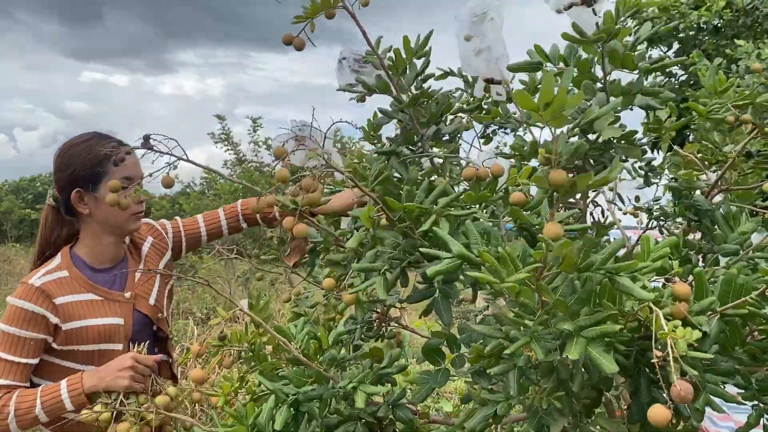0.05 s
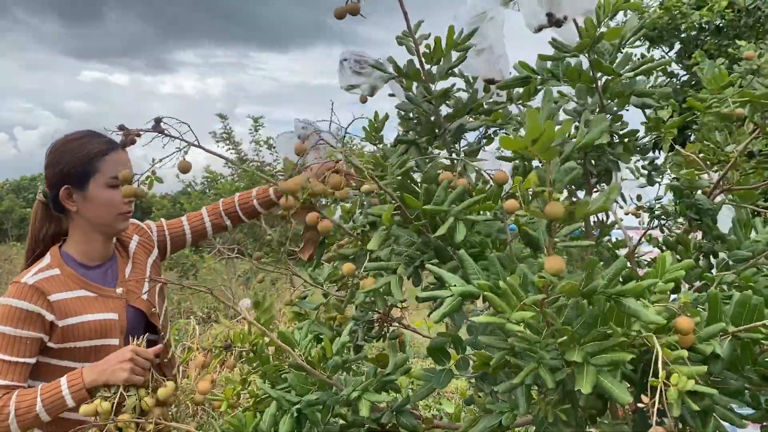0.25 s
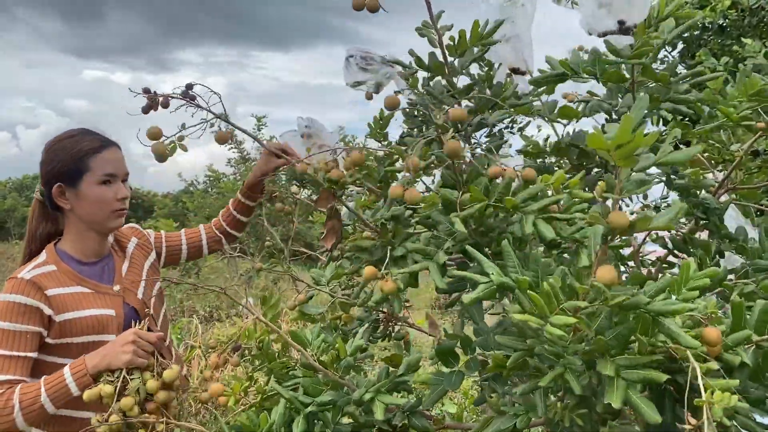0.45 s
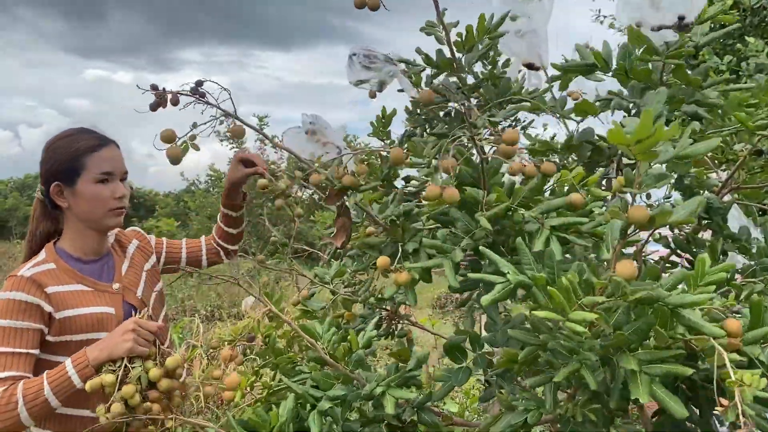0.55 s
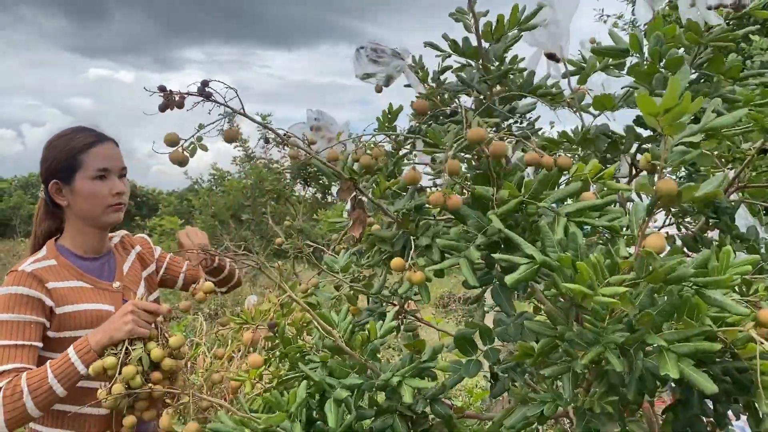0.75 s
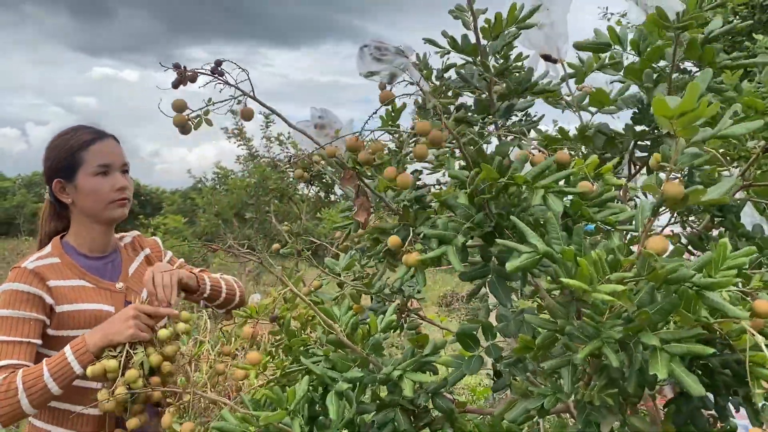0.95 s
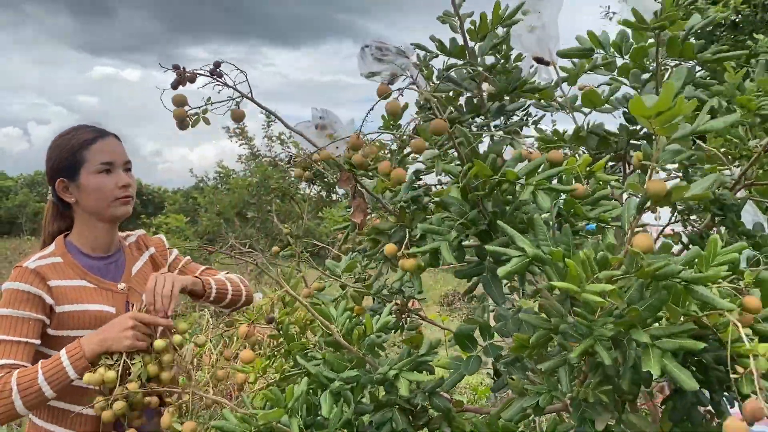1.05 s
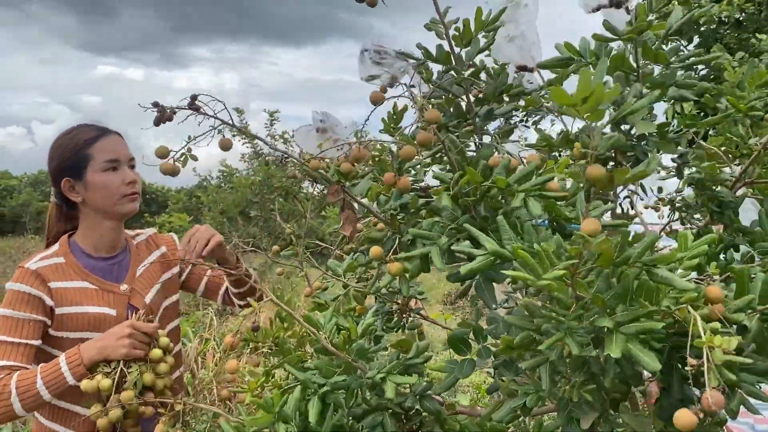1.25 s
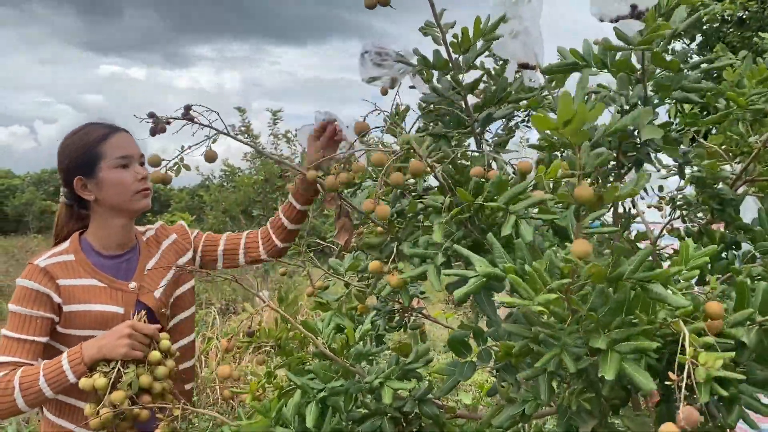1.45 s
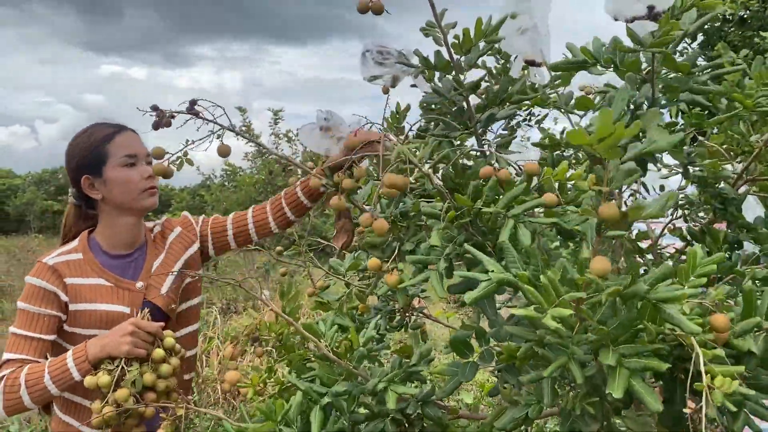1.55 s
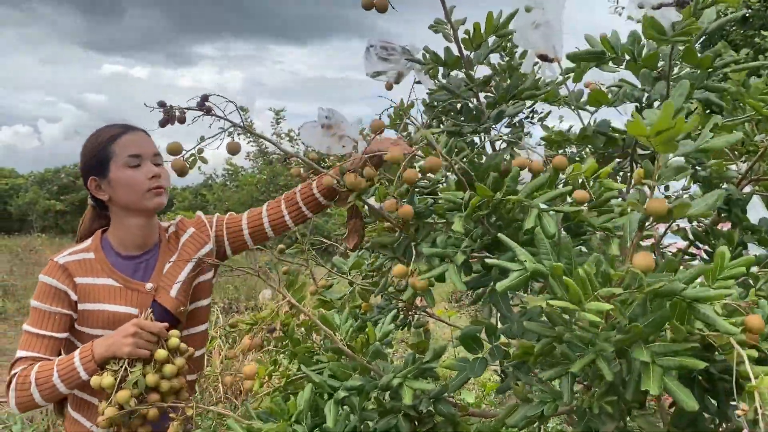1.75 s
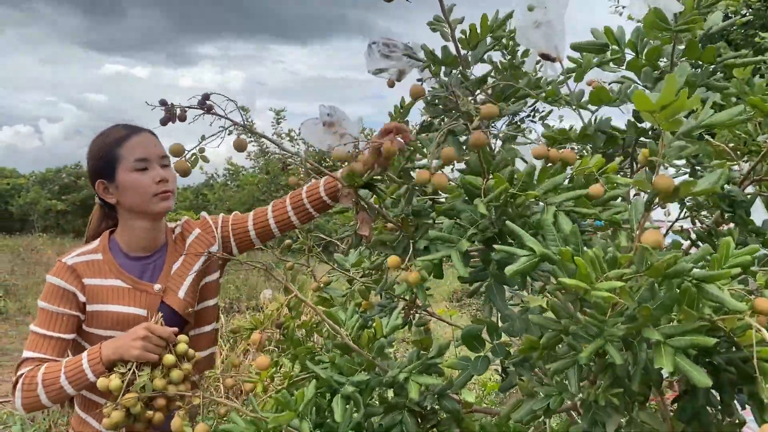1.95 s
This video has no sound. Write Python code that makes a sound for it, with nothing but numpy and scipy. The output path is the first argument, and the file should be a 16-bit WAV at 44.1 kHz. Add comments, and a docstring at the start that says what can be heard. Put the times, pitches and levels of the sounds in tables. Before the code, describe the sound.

Soft leaf rustling and a stalk snapping off a tree, while wind bumps the microphone.

```python
"""Fruit is picked by hand from a tree outdoors. Over the hush of a field, leaves rub and crackle
while a light gust buffets the microphone for the first second. A small bird chirps far off.
At 0.8 s the stalk fractures and rings, and the freed branch swings back with a few dry knocks.
As the wind drops, the bird calls again among farther twittering, and a bent twig squeaks."""
import sys
import numpy as np
from scipy import signal
from scipy.fft import rfft, irfft
from scipy.io import wavfile
from scipy.ndimage import uniform_filter1d

SR = 44100
rng = np.random.default_rng(int(sys.argv[2]) if len(sys.argv) > 2 else 0)


def int16_out(signal):
    """Quantize to a 16-bit WAV file."""
    q = np.round(np.clip(np.atleast_2d(signal).T, -1, 1) * 32767)
    wavfile.write(sys.argv[1], SR, q.astype(np.int16))


N = 88200
T, HZ = np.arange(N) / SR, np.fft.rfftfreq(N, 1 / SR)


def amp(db):
    """Amplitude ratio of a level in decibels."""
    return 10 ** (np.asarray(db) / 20)


def unit(x):
    """Normalisation to an rms of 1."""
    return x / np.sqrt(np.mean(x ** 2) + 1e-20)


def envelope(points):
    """Amplitude envelope interpolated from rows of t/s, level/dB."""
    return amp(np.interp(T, *np.transpose(points)))


def spectrum(points):
    """Spectrum level interpolated in log frequency from rows of f/Hz, level/dB."""
    hz, db = np.transpose(points)
    return np.interp(np.log(HZ + 1), np.log(hz), db)


def band(hz, octaves, floor_db):
    """Band-pass response in dB, 6 dB down at the given octaves either side of the centre."""
    return np.maximum(-6 * (np.log2((HZ + 1) / hz) / octaves) ** 2, floor_db)


def colour(x, db):
    """Minimum-phase filtering at unit power gain: only the shape of the spectrum counts."""
    cepstrum = irfft(np.log(unit(amp(db)) + 1e-6), N)
    cepstrum[1:N // 2] *= 2
    cepstrum[N // 2 + 1:] = 0
    return irfft(rfft(x) * np.exp(rfft(cepstrum)), N)


def wobble(hz):
    """Random modulation: noise of rms 1, low-passed at the given rate."""
    return unit(irfft(rfft(rng.standard_normal(N)) / (1 + (HZ / hz) ** 4), N))


def scatter(x, db, decay_s=.012):
    """Scattering by foliage adds a diffuse echo that decays exponentially."""
    tail = rng.standard_normal((2, SR // 4)) * np.exp(-T[:SR // 4] / decay_s)
    return x + amp(db) * signal.fftconvolve(x, tail / np.linalg.norm(tail[0]), axes=1)[:, :N]


# spectra of the hush and the drone: f/Hz, relative level/dB
HUSH_SPECTRUM = [(30, 5.5), (150, 11.5), (310, 6), (430, -2), (600, -1), (740, 0), (880, 2.5), (1050, -4.5),
                 (1400, -4), (2200, -1.5), (3000, -2.5), (5000, -1.5), (7000, -2.5), (9300, -12.5),
                 (10800, -26), (12200, -27), (14000, -29)]
DRONE_SPECTRUM = [(60, -24.5), (140, 5), (230, 2), (350, 4.5), (430, -6.5), (560, -28), (1000, -53)]
# their envelopes: t/s, level/dB
HUSH_LEVEL = [(0, -70), (.4, -68.5), (1.15, -71), (1.5, -70), (2, -72)]
DRONE_LEVEL = [(0, -79), (.15, -68.5), (.27, -68), (.4, -69.5), (.6, -77), (1, -84), (1.4, -96),
               (1.53, -78.5), (1.68, -70.5), (1.8, -75.5), (1.87, -76.5), (2, -70)]
def field():
    """Superposition of distant sources: hushing foliage, a low drone and a thin, wavering whine."""
    hush = envelope(HUSH_LEVEL) * colour(rng.standard_normal((2, N)), spectrum(HUSH_SPECTRUM))
    drone = envelope(DRONE_LEVEL) * colour(rng.standard_normal((2, N)), spectrum(DRONE_SPECTRUM))
    whine_hz = 894 * (1 + .00718 * wobble(15))
    whine = amp(-86 + 6 * wobble(15)) * np.sin(2 * np.pi * np.cumsum(whine_hz) / SR)
    return hush + drone * np.array([[1], [.6]]) + whine * np.array([[1], [0]])


# rustle spectrum: f/Hz, relative level/dB
LEAF_SPECTRUM = [(150, -13), (350, 1), (500, -4), (700, -6.5), (950, -2.5), (1500, 0), (2200, 0.5),
                 (2900, -3), (4700, -1), (6000, -7), (8200, -4), (9300, -3), (10600, -9), (12200, -21.5),
                 (13600, -35.5), (15500, -27)]
# envelope of the brushing, and the gain of its treble: t/s, level/dB
BRUSH_LEVEL = [(0, -58), (.036, -63), (.075, -64), (.14, -60.5), (.17, -56), (.205, -55.5), (.26, -56.5),
               (.278, -57), (.295, -66), (.45, -65.5), (.54, -66), (.59, -65), (.67, -67.5), (.78, -70),
               (.82, -67), (.88, -64), (.96, -67.5), (1.03, -65), (1.1, -73), (1.2, -74), (1.3, -79.5),
               (1.43, -70.5), (1.465, -84.5), (1.58, -73), (1.68, -79.5), (1.745, -74), (1.81, -79.5),
               (1.92, -72), (2, -77)]
TREBLE_GAIN = [(0, -2), (.2, -4), (.35, -0.5), (.6, -1.5), (.8, 2), (1, -5.5), (1.15, -6), (1.28, -3),
               (1.4, 5.5), (1.52, 6.5), (1.62, -1), (1.8, 3.5), (1.93, 4.5)]
def leaves(crackles_per_s=900, treble_hz=8100):
    """Friction of leaf on leaf gives fluttering noise and a Poisson train of tiny crackles."""
    sizes = amp(2 * np.minimum(rng.exponential(1, (2, N)), 4)) * rng.choice([-1, 1], (2, N))
    impulses = sizes * (rng.random((2, N)) < crackles_per_s / SR)
    crackles = unit(scatter(impulses, db=-8.5, decay_s=.0015))
    rub = amp(-1.5) * rng.standard_normal((2, N)) + amp(-2) * crackles
    flutter = amp(1.3 * wobble(60))
    rustle = colour(rub * envelope(BRUSH_LEVEL) * flutter, spectrum(LEAF_SPECTRUM))
    body = irfft(rfft(rustle) / (1 + (HZ / treble_hz) ** 8), N)
    return body + (rustle - body) * envelope(TREBLE_GAIN)


# rumble spectrum, and what a full gust adds to it: f/Hz, relative level/dB
RUMBLE_SPECTRUM = [(15, -32.5), (30, -21.5), (48, -3.5), (66, 0), (85, -5.5), (110, -15.5), (150, -32),
                   (230, -44.5), (350, -78), (600, -86)]
GUST_BOOST = [(40, 2.5), (70, -3), (115, 10.5), (170, 18), (260, 13), (600, 15)]
# wind envelope: t/s, level/dB
WIND_LEVEL = [(0, -57), (.19, -56.5), (.24, -43), (.3, -46.5), (.37, -45), (.5, -48), (.56, -42),
              (.66, -43.5), (.74, -49.5), (.82, -39.5), (.9, -48.5), (.97, -39.5), (1.015, -59),
              (1.09, -63), (1.16, -58), (1.25, -59.5), (1.33, -59), (1.5, -66.5), (1.56, -66.5),
              (1.66, -59.5), (2, -60.5)]
def wind(full_gust_db=-48.5, common_gain=.88):
    """Turbulent pressure on the microphones makes a partly coherent rumble that brightens in a gust."""
    noise = rng.standard_normal((2, N))
    strength, calm_db = envelope(WIND_LEVEL), spectrum(RUMBLE_SPECTRUM)
    gust = np.minimum(strength / amp(full_gust_db), 1)
    dull, bright = colour(noise, calm_db), colour(noise, calm_db + spectrum(GUST_BOOST))
    air = signal.hilbert((1 - gust) * dull + gust * bright)
    swell = np.sqrt(uniform_filter1d(uniform_filter1d(abs(air) ** 2, size=1100), size=600))
    common, apart = unit(air.real / swell ** .49)  # partly evens out the random swells
    return (common_gain * common + np.sqrt(1 - common_gain ** 2) * np.array([apart, -apart])) * strength


# spectrum of a cracking twig: f/Hz, relative level/dB
TWIG_SPECTRUM = [(200, -22.5), (600, -11.5), (1000, -5), (1500, -6.5), (2100, 2), (3000, -0.5),
                 (4600, -0.5), (6000, -4.5), (8000, 0.5), (9500, -6), (11000, -9.5), (12300, -26),
                 (13800, -21), (15500, -40)]
# leaf flicks and twig ticks: t/s, level/dB, decay/s, tilt/(dB/octave), click/dB, resonance f/Hz
TWIG_TICKS = [(.046, -52, .0055, 2.5, 3, 4320), (.1605, -49, .004, -3, -12, 3780),
              (.1675, -50.5, 0.003, -2, 1, 3040), (.173, -51.5, 0.0023, -1.5, 2, 1110),
              (.199, -52, 0.0024, -6, 1, 3400), (.2028, -53, 0.0023, -1, 3, 1880),
              (.2135, -60, 0.0036, -4, 0, 3900), (.2285, -55, 0.0051, -2, 0, 1020),
              (.311, -58, 0.0082, -4, 0, 1480), (.327, -53.5, 0.0048, -1.5, -16, 4400),
              (.428, -56, 0.0016, 0, -2, 4800), (.45, -59, 0.007, 0.5, -18, 3170),
              (.513, -57, 0.0021, 1, -14, 2150), (.557, -54, 0.0059, -0.5, 0, 5100),
              (.585, -59, 0.0038, -8.5, 4.5, 1150), (.604, -56.5, 0.0045, 2, -12, 3930),
              (.656, -58.5, .002, 2, -11, 3820), (.734, -58, .0052, 2.5, 1.5, 6240),
              (.7655, -54.5, 0.0061, -1.5, -19, 2240), (.8295, -57, 0.0063, 2.5, -15, 3800),
              (.8575, -54, 0.0051, 1, -1, 3540), (.9355, -53.5, 0.0086, -2, -8, 5900),
              (.9415, -59, 0.0023, -3, -5, 2500), (.951, -59, 0.0065, -0.5, -8, 6490),
              (.9895, -58, 0.0048, 1, -11, 6260), (1.022, -59, .004, -1, -14, 2350),
              (1.079, -66, 0.0071, -7, -10, 1400), (1.311, -63.5, 0.0022, 6, -5, 5870),
              (1.322, -63.5, .003, -7.5, -3, 2230), (1.572, -60.5, 0.0076, 5.5, -18, 5400),
              (1.739, -65.5, 0.0069, -0.5, -14, 4290)]
def cracks(rows, resonance_db=5.5, resonance_octaves=.3):
    """Impulsive excitation: a click and a dying spray of splinters are filtered by resonant wood."""
    out, twig = np.zeros((2, N)), spectrum(TWIG_SPECTRUM)
    octaves = np.log2(np.clip(HZ, 700, 10000) / 3000)
    for start, db, decay_s, tilt_db, click_db, wood_hz in rows:
        burst = rng.standard_normal((2, N)) * np.exp(-T / decay_s)
        burst[0, 0] = burst[1, 8] = 6 * amp(click_db)
        wood = resonance_db * np.exp(-(np.log2((HZ + 1) / wood_hz) / resonance_octaves) ** 2)
        at = int(start * SR)
        out[:, at:] += amp(db) * colour(burst, twig + tilt_db * octaves + wood)[:, :N - at]
    return out


# eddies: centre t/s, level/dB, f/Hz, half length/s, lag at the left microphone/s
EDDIES = [(0.062, -56.5, 206, 0.01, 0), (0.076, -43.5, 60.8, 0.0079, -.002),
          (0.2646, -26.5, 121, 0.0049, .001), (0.286, -36, 85, 0.028, .002),
          (0.313, -41.5, 80, .01, 0.0003), (.338, -38, 81, 0.011, .002), (0.402, -25.5, 60, 0.019, 0),
          (0.443, -50.5, 204, 0.0051, 0), (0.455, -30.5, 93, 0.0086, .002), (.555, -31, 99.2, 0.015, 0),
          (0.596, -34.5, 81, 0.009, -.001), (0.642, -31.5, 88.5, 0.0091, -.002),
          (0.678, -43, 79, 0.011, -.002), (0.727, -36, 60.8, 0.055, -.003), (0.784, -36.5, 210, 0.0045, 0),
          (0.793, -33, 87, 0.017, 0), (0.827, -34, 75, 0.043, 0), (0.872, -35.5, 85, .009, 0),
          (0.9345, -27.5, 82, 0.0096, .0005), (0.982, -33, 77, 0.0078, 0), (1.092, -46, 66.8, 0.057, .002),
          (1.195, -54, 68, 0.028, 0), (1.236, -48, 60.4, .016, .003), (1.487, -55.5, 71.3, 0.052, 0)]
def eddy(centre_s, db, hz, half_s, lag_s, sag=.19):
    """Convection carries an eddy past each microphone in turn: a few pressure swings that slow down."""
    t = np.clip(T - centre_s - lag_s * np.array([[1], [-1]]) / 2, -.15, .15)
    cycles = hz * (t - sag * half_s * np.log(np.cosh(t / half_s)))
    return amp(db) * np.sin(2 * np.pi * cycles) / np.cosh(1.91 * t / half_s)


# chirps of a distant bird: t/s, level/dB
BIRD_CHIRPS = [(.315, -66.5), (.378, -72), (1.262, -73), (1.335, -73), (1.402, -70), (1.466, -66.5),
               (1.528, -66), (1.596, -67.5)]
def bird(chirp_s=.054, top_hz=6580, end_hz=6020):
    """Frequency modulation: thin falling whistles, blurred by scattering on their way."""
    song = np.zeros((2, N))
    for start, db in BIRD_CHIRPS:
        progress = np.clip((T - start) / chirp_s, 0, 1)
        hz = (top_hz + (end_hz - top_hz) * progress) * (1 + .007 * wobble(97))
        song[0] += amp(db) * np.sin(np.pi * progress ** 1.5) * np.sin(2 * np.pi * np.cumsum(hz) / SR)
    return scatter(song, db=-5, decay_s=.035)


# knocks of twig on twig: t/s, peak level/dB, f/Hz, half width/octaves
TWIG_KNOCKS = [(0.4221, -47, 1710, 0.49), (0.8566, -44.5, 1000, 0.69), (.8958, -46, 1900, 0.9),
               (.899, -44, 1520, 1.25), (.978, -43, 2060, 0.71), (1.51, -48, 2100, 0.75),
               (1.574, -63.5, 754, 0.56)]
def knocks():
    """Impact on heavily damped wood: each knock is the brief impulse response of a broad band."""
    out = np.zeros((2, N))
    for start, db, hz, octaves in TWIG_KNOCKS:
        pulse = colour(signal.unit_impulse(N), band(hz, octaves, floor_db=-50))
        at = int(start * SR)
        out[0, at:] += amp(db) * pulse[:N - at] / abs(pulse).max()
    return scatter(out, db=-8)


# fibres giving way: t/s, level/dB, decay/s, tilt/(dB/octave), click/dB, resonance f/Hz
FIBRE_BREAKS = [(.795, -44.5, 0.0024, 0.5, -17, 7800), (.7985, -44, 0.0034, 0, -20, 4540),
                (.8012, -47.5, 0.0026, -6.5, -7, 2250), (.805, -48, 0.0033, 3.5, -12, 2970)]
# modes of the stalk: f/Hz, level/dB, T60/s
STALK_MODES = [(2066, -54, .025), (3750, -48, .014), (4820, -47.5, .02), (5940, -52, .014),
               (6900, -52, .012)]
def stalk():
    """Fracture in four quick steps; the second and strongest sets the stalk's damped modes ringing."""
    t = np.maximum(T - FIBRE_BREAKS[1][0], 0)
    ring = sum(amp(db - 60 * t / t60) * np.sin(2 * np.pi * hz * t) for hz, db, t60 in STALK_MODES)
    return scatter(cracks(FIBRE_BREAKS) + ring * np.array([[.8], [.6]]), db=-5.5)


# envelope of the farther birds: t/s, level/dB
TWITTER_LEVEL = [(0, -88), (1, -84), (1.15, -74.5), (1.35, -75), (1.55, -77), (1.62, -87), (2, -90)]
def twitter():
    """Incoherent summation blurs farther birds into a wavering band of noise, off to the left."""
    chorus = colour(rng.standard_normal((2, N)), band(hz=6100, octaves=.16, floor_db=-60))
    return chorus * envelope(TWITTER_LEVEL) * amp(2.7 * wobble(25)) * np.array([[1], [.4]])


def squeak(start_s=1.511, length_s=.021, low_hz=1900, top_hz=2850):
    """A twig bent by the hand squeaks: a tone glides up and holds, roughened by frequency jitter."""
    progress = np.clip((T - start_s) / length_s, 0, 1)
    hz = top_hz + (low_hz - top_hz) * np.exp(-(progress / .25) ** 2)
    cycles = np.cumsum(hz * (1 + .05 * wobble(360))) / SR
    fade = np.sqrt(1 - progress) * (progress > 0)
    return amp(-66) * fade * np.sin(2 * np.pi * cycles) * np.array([[1], [0]])


# microphone pair: f/Hz, likeness (0-1), phase lead of the left/rad, left minus right level/dB
PAIR_RESPONSE = [(100, .88, -.2, .5), (1000, .88, .1, .5), (1900, .88, 0, -.3), (2900, .8, 1.1, 0),
                 (4200, .7, 1, 2.7), (5400, .55, 1, 3.7), (6600, .75, 0, 3), (8350, .95, -3.1, 1),
                 (9900, .96, -6.1, 0), (10400, .94, -6.5, 0), (12000, .92, -9.4, 0), (13400, .9, -12.5, 0),
                 (15500, .9, -13, 0)]
def microphones(pair, spread):
    """Partial coherence: row 0 feeds both sides, row 1 their difference, which grows with spread."""
    hz, *columns = np.transpose(PAIR_RESPONSE)
    likeness, lead, side_db = (np.interp(HZ, hz, column) for column in columns)
    share = np.clip(spread ** 2 * (1 - likeness) / 2, 0, .5)
    common, apart = np.sqrt(1 - share) * rfft(pair[0]), np.sqrt(share) * rfft(pair[1])
    left = (common + apart) * amp(side_db / 2)
    right = (common - apart) * np.exp(-1j * lead) / amp(side_db / 2)
    return irfft([left, right], N)


def scene():
    """Superposition of the near tree, the more diffuse distance and wind on the microphones."""
    tree = leaves() + scatter(cracks(TWIG_TICKS), db=-3) + knocks() + stalk() + squeak()
    distance = microphones(field() + bird(), spread=2.16) + twitter()
    buffeting = wind() + sum(eddy(*row) for row in EDDIES)
    return microphones(tree, spread=1.44) + distance + buffeting


def record(dry):
    """Band limiting: a linear-phase low-pass filter cuts off at 15.6 kHz."""
    lowpass = signal.firwin(511, 15600, window=("kaiser", 9), fs=SR)
    return signal.oaconvolve(dry, lowpass[None], "same")


dry = scene()
out = record(dry)
int16_out(out)
```